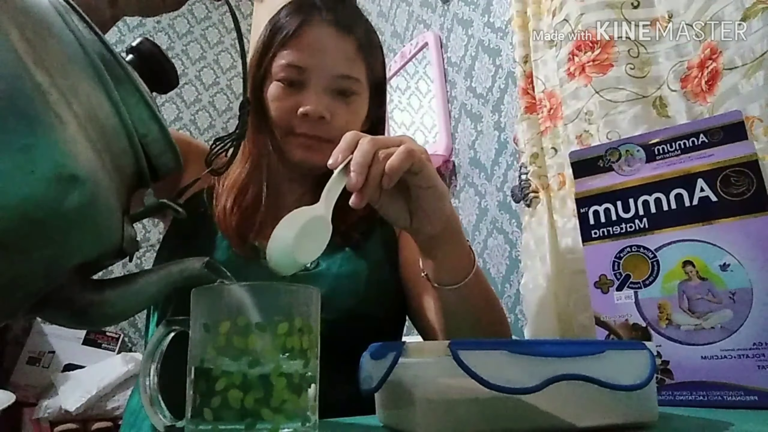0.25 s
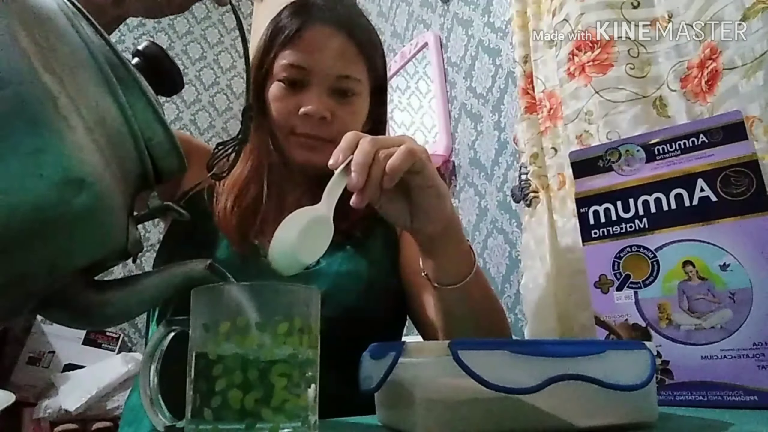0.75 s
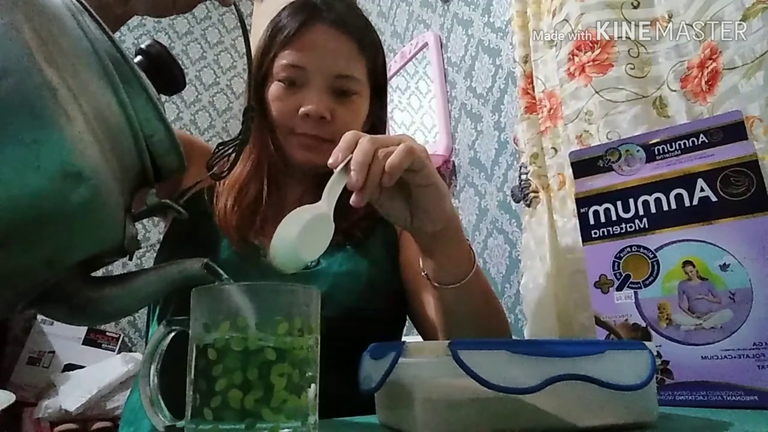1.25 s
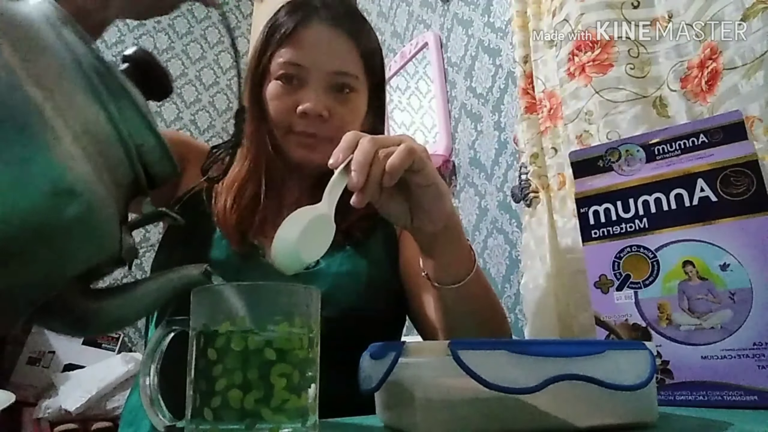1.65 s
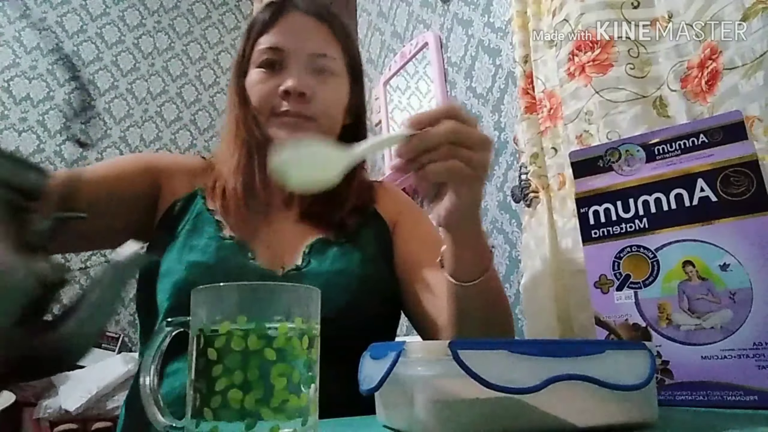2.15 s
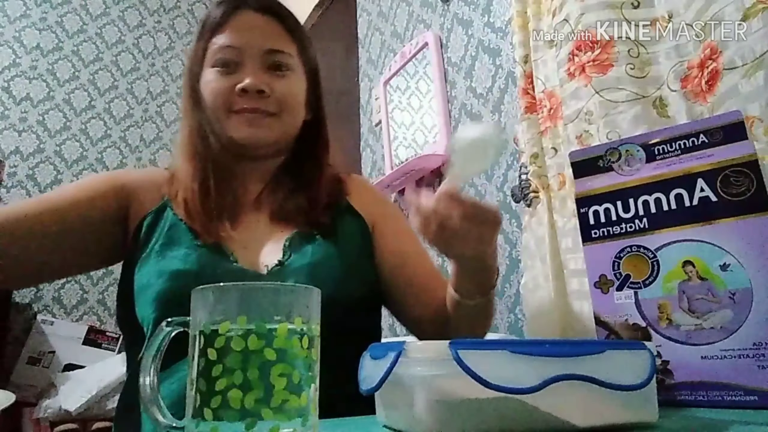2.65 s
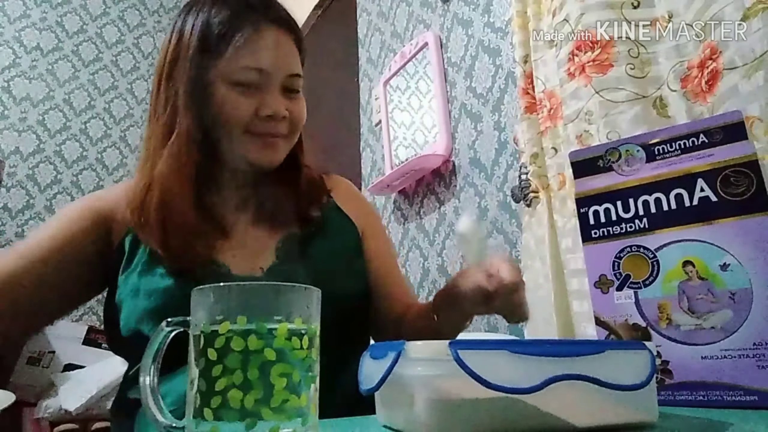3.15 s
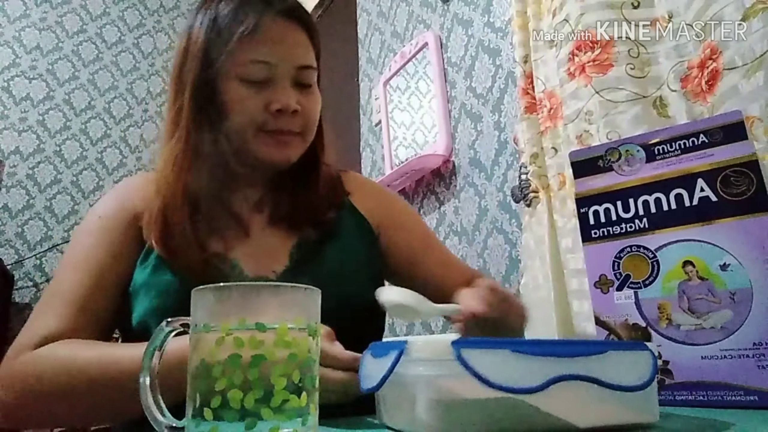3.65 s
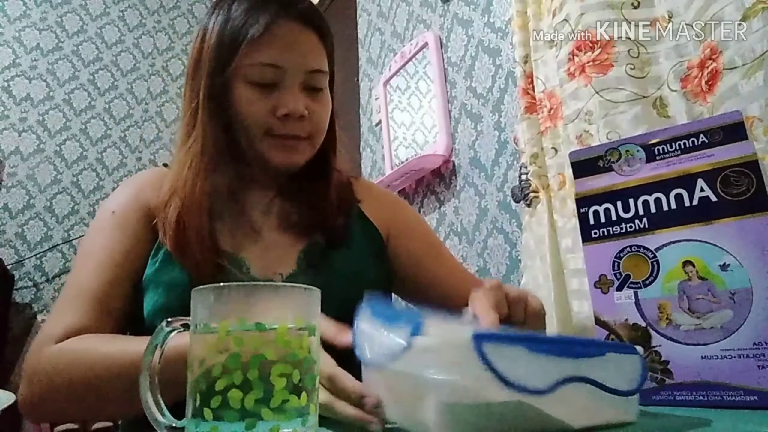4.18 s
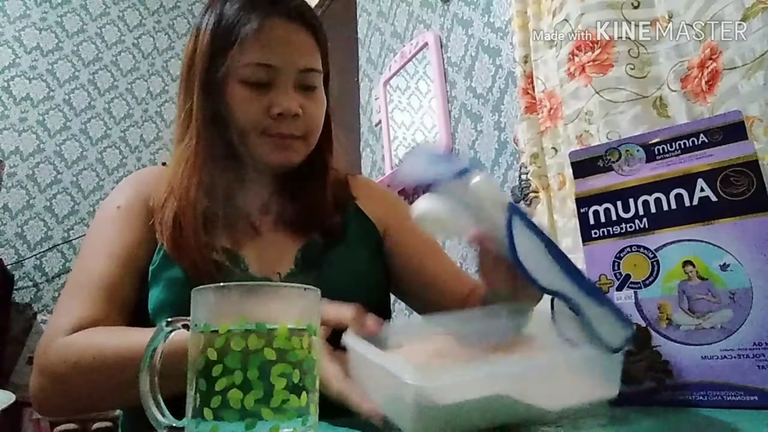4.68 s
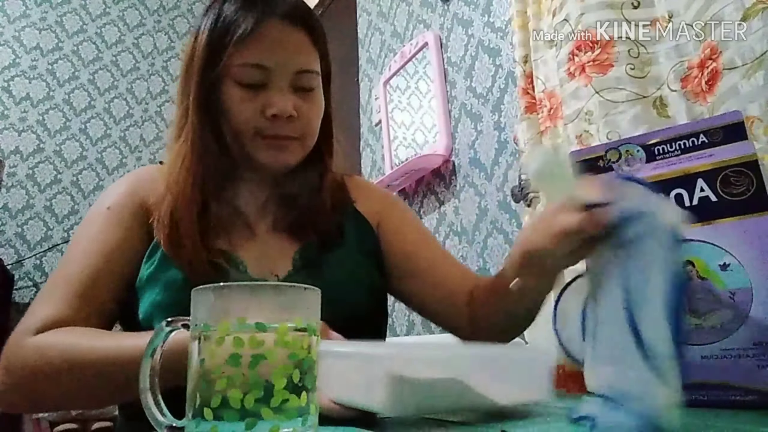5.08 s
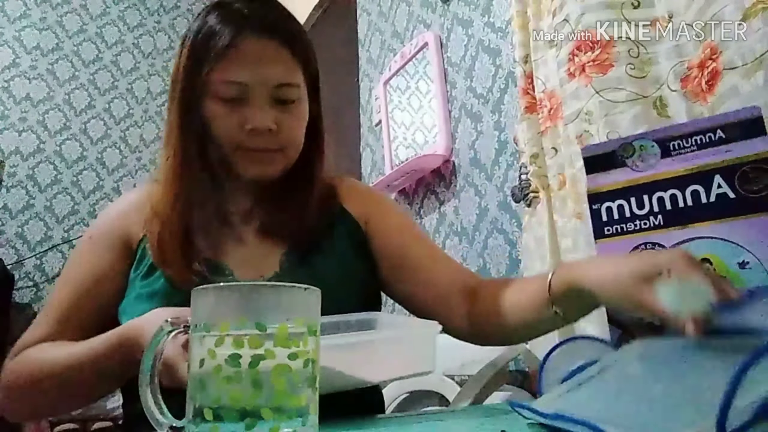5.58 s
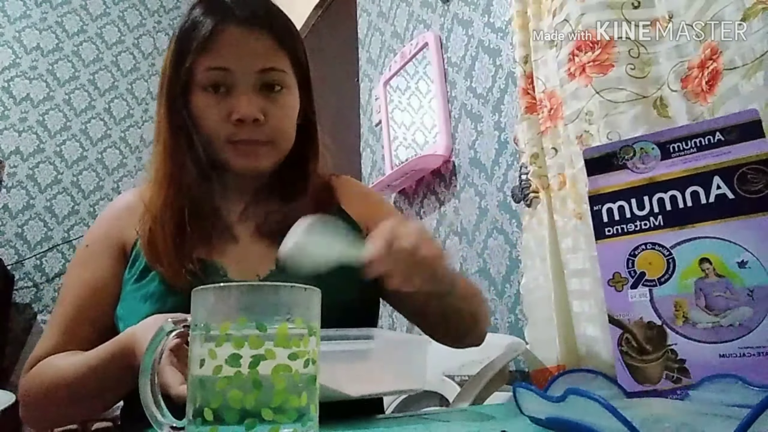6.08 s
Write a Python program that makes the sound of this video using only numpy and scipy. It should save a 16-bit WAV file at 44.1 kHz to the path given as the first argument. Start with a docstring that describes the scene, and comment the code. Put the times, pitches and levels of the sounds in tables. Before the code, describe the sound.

Water trickles faintly into a mug, a metal kettle clanks and clatters down, then a plastic box lid snaps loudly open and lands with a clack.

```python
"""At a table in a small room, water trickles from a metal kettle into a mug: resonant noise over a low hum.
The kettle clanks twice (ringing shell, low table thud) and is set aside on its stand. An arm thumps the table.
The lid of a plastic container creaks and snaps off (swinging wall, clicking flaps), then is laid down with
a clack and rocks to rest. Handling is friction noise over a rumble; room noise and a faint whine run on."""
import sys
import numpy as np
from scipy import signal
from scipy.fft import rfft, irfft, next_fast_len
from scipy.io import wavfile
from scipy.ndimage import map_coordinates

SR = 44100
rng = np.random.default_rng(int(sys.argv[2]) if len(sys.argv) > 2 else 0)


def master(y):
    """Save y as 16-bit WAV."""
    cut = np.clip(np.atleast_2d(y).T, -1, 1)
    pcm = np.round(cut * 32767)  # scale
    wavfile.write(sys.argv[1], SR, pcm.astype(np.int16))


N = 278906

# reverberation of the small room: f/Hz, t60/s
ROOM_T60 = [(60, 0.99), (150, 0.17), (500, 0.53), (1000, 0.25), (2000, 0.25), (6000, 0.25), (15000, 0.13)]
# colour of the reflections: f/Hz, relative level/dB
WALL_COLOUR = [(60, 3.5), (200, -4), (600, -1.5), (1000, -0.5), (2000, 2.5), (4000, -3.5), (6500, 1.5),
               (10000, -6), (15000, 4)]
# room noise: f/Hz, relative level/dB
AIR_SPECTRUM = [(25, -5), (50, -17), (78, -12), (100, -18), (135, -11.5), (200, -13), (300, -18),
                (450, -19.5), (600, -19), (850, -18.5), (1130, -24.5), (1600, -23.5), (2200, -30.5),
                (4200, -38.5), (15000, -41), (16000, -23.5)]
# rms of the room noise: t/s, level/dB
AIR_LEVEL = [(0, -60.5), (2.2, -58), (3.3, -60.5), (5.5, -60.5), (5.75, -67), (6.0, -65), (6.4, -62.5)]
# steady whine: f/Hz, level over room noise/dB
WHINE_TONES = [(841, -12.5), (1795, -23.5)]

# pour gain, common to stream and hum: t/s, level/dB
POUR_LEVEL = [(0, -69), (.3, -61), (.55, -68), (.8, -63), (1.05, -70), (1.35, -59), (1.9, -61), (2.2, -69),
              (2.3, -78)]
# resonances of the stream drumming in the mug: f/Hz, width/Hz, relative level/dB
STREAM_PEAKS = [(141, 30, -0.5), (174, 45, -2), (448, 21, -1.5), (914, 49, -11)]
STREAM_DB = -7.5  # over the pour gain
# low hum while pouring: f/Hz, level over pour gain/dB
HUM_TONES = [(134, -10), (162, -5), (187, -4.5)]
# faint narrow tones of the tilting kettle and the mug: start/s, end/s, f/Hz, width/Hz, peak level/dB
SINGS = [(.35, 0.45, 438, 30, -63.5), (0.91, 1.01, 472, 25, -69), (1.4, 1.48, 2280, 150, -66),
         (1.73, 1.91, 2140, 270, -64.5), (1.56, 1.94, 934, 160, -58.5), (1.4, 2.34, 860, 350, -64)]

# four bands of a blow, as filters: thump, knock, click, tick
BAND_FILTERS = [signal.butter(3, edges, 'band', fs=SR, output='sos') for edges in [(45, 400), (400, 1600),
                (1600, 5000), (5000, 16000)]]
# first instant of a hard contact: f/Hz, relative level/dB
SPIKE_SPECTRUM = [(300, -25), (1000, -5.5), (2000, 1), (3300, 1), (4500, -5.5), (6500, -0.5), (8000, -9.5),
                  (11000, -15), (15500, -8)]
# contact noise of box and kettle: f/Hz, relative level/dB
CRACK_SPECTRUM = [(100, 15), (700, 10), (1500, 1), (3000, -7), (4400, -10), (6700, -10), (8000, -14),
                  (11000, -23), (13500, -25), (15000, -20), (16000, -1.5)]
SPOT_OCTAVES = 0.21  # reach of a struck spot among the modes

# handle knocks on the kettle: t/s, knock level/dB, dullness (click under knock)/dB,
# favoured low f/Hz, favoured high f/Hz, tick over knock/dB
CLANKS = [(1.467, -36.5, 4.5, 440, 2880, -24), (1.632, -34, 6.4, 573, 1260, -20)]
# kettle shell, with a low table thud in the first row: f/Hz, relative level/dB, t60 before CLANK_RING/s
CLANK_MODES = [(70.6, 20, 0.09), (192, -18, 0.185), (426, 5, 0.15), (435.3, 5, 0.14), (545, -1, 0.12),
               (662, 2.5, 0.16), (710, -9, 0.24), (740, -16, 0.17), (875, 0, 0.19), (1038, 0.5, 0.14),
               (1050, -8, 0.097), (1124, -8, 0.29), (1160, -12, 0.07), (1233, -3.5, 0.12),
               (1348, 0.5, 0.086), (1406, -1, .05), (1530, -4, 0.065), (1820, -11, 0.089), (1890, -9, .06),
               (1996, -7, 0.13), (2120, -5.5, 0.14), (2246, -5, 0.079), (2335, -11, 0.21),
               (2560, -10, 0.093), (2740, -11, 0.032), (2940, 6, 0.03), (2965, -3.5, 0.031),
               (3150, -8, 0.1), (3430, -1.5, 0.054), (3580, -6, 0.082), (3630, -3, .035), (3815, -8, 0.058),
               (4300, -8, 0.09), (4460, -3, 0.022), (5700, -10, 0.022)]
CLANK_WEIGHT_DB, CLANK_RING = -12, 0.97  # bass over knock; multiple of t60
REBOUND_S, REBOUND_LOSS_DB, REBOUND_DULL_DB = 0.009, 7.5, 1  # handle touches the shell again
# base lands on its stand and chatters: t/s, knock level/dB, weight (bass over knock)/dB,
# dullness (click under knock)/dB, chatter length/s
SETDOWNS = [(2.6922, -41.5, -14, 5, .005), (2.7, -42.5, -10, 1, .015), (2.728, -49, -14, 28, .015),
            (2.753, -51.5, -16, 2.5, .005), (2.762, -30, -8.5, 7, .015), (2.777, -31, -2, 9, .015),
            (2.795, -38, 0.5, 10, .015), (2.818, -38.5, 3.5, 11.5, .005), (2.889, -50.5, -4, 12, .005)]
# base on its stand: f/Hz, relative level/dB, t60 before the blow's ring factor/s
STAND_MODES = [(69.8, 0, 0.56), (129, -4, 0.3), (187, 4, 0.11), (253, 8, 0.073), (313.5, 5, 0.16),
               (415, 0, 0.085), (460.6, 5.5, 0.14), (496, 7, 0.12), (599, 1.5, 0.087), (670, 3, 0.11),
               (843, 1.5, 0.2), (886, -1, 0.17), (938, 2.5, 0.1), (1032, 7, 0.057), (1303, -2, 0.16),
               (1382, -2.5, 0.12), (1620, -14, .12), (1870, -4, 0.07), (2220, -2.5, 0.15),
               (2340, -3, 0.076), (2770, -2, 0.066), (3980, -4, 0.061), (5430, -3.5, 0.07)]
# scraping metal: f/Hz, relative level/dB
RATTLE_SPECTRUM = [(100, 1), (600, 2.5), (1500, -9), (4000, -5), (5000, -4.5), (6700, -0.5), (8000, -15.5),
                   (10500, -18), (12300, -12), (15000, -12), (16000, -7)]
CHATTER_GAP_S, CHATTER_GROWTH = 0.0075, 1.3  # first gap; each gap over the last
CHATTER_LOSS_DB, CHATTER_WEIGHT_DB, CHATTER_DULL_DB = 2.5, 1.5, 2.5  # change per touch
PLASTIC_FALL, BASE_FALL = 1.52, 1  # loss of the tick band, as a multiple of the dullness

# arm, container, lid and spoon meet the table: t/s, knock level/dB, weight (bass over knock)/dB,
# dullness (click under knock)/dB, ring (multiple of t60), favoured boom f/Hz, favoured knock f/Hz
KNOCKS = [(2.3001, -34.5, 10, 19.6, 0.42, 225, 980), (2.4434, -42.5, 12.5, 28, 0.49, 265, 865),
          (2.511, -42, 8.5, 15.5, 0.9, 116, 920), (3.025, -55.5, 13, 25, 0.56, 190, 510),
          (3.373, -54, 9, 6.1, 1.26, 115, 607), (3.658, -41, -2, 20, 0.8, 258, 563),
          (3.701, -51.5, -3, 12, 0.63, 230, 704), (3.771, -47.5, 3, 22, 0.46, 120, 900),
          (3.811, -56, 9.5, 16, 0.55, 150, 800), (3.826, -52.5, 3, 12.6, 0.76, 150, 700),
          (4.556, -21.5, -2, 9.7, 0.97, 173, 650), (4.5598, -25, 1, 16, 0.8, 285, 490),
          (4.586, -27.5, -13, 26, 0.73, 277, 1130), (4.754, -41, 1, 25, 0.92, 147, 796),
          (4.8752, -33.5, -1.5, 23, 0.64, 124, 674), (5.3101, -28, 5.5, 22.5, 0.81, 216, 750),
          (5.3357, -41.5, 14, 25, 0.44, 218, 454), (5.5462, -21, 3.5, 10.2, .85, 179, 830),
          (5.5496, -27, 2.5, 10.4, 1.07, 278, 1500), (5.575, -34, 3, 19, 1.3, 149.5, 1500),
          (5.601, -43, -7, 15, 1.9, 180, 1540)]
# table top and the plastic box on it: f/Hz, relative level/dB, t60 before the blow's ring factor/s
BOX_MODES = [(70, -22, 0.4), (113.2, -3, 0.24), (147.7, -8, .09), (184.8, 3, 0.11), (216.4, 1.5, 0.077),
             (250, 2.5, 0.065), (275.6, 2, 0.1), (353, -7, 0.053), (421, 1, 0.072), (486, 0, 0.1),
             (564, -.5, 0.13), (660, 3, 0.046), (753, 4, 0.025), (792, 6, 0.021), (928, 0.5, 0.056),
             (1009, 2, 0.037), (1217, -8, 0.06), (1343, -17, 0.097), (1531, -10.5, 0.12),
             (1794, -12.5, 0.036), (2040, -1, 0.03), (2150, -4, .035), (2440, -4, 0.012), (2770, -7, 0.026),
             (3500, -19, 0.015), (6600, -2, 0.0082)]
# the rest of the weight lands just after the edge
SETTLE_S, SETTLE_LOSS_DB, SETTLE_WEIGHT_DB, SETTLE_DULL_DB = 0.011, 8.5, 6, 13
# lid rocks to rest: first touch, first gap, each gap over the last, first level, loss per touch
ROCK_START_S, ROCK_GAP_S, ROCK_SHRINK, ROCK_DB, ROCK_LOSS_DB = 5.612, 0.069, 0.62, -35.5, 5.5
ROCK_WEIGHT_DB, ROCK_DULL_DB, ROCK_BOOM_HZ, ROCK_KNOCK_HZ = 4, 26, 176, 570

# arm, kettle, box or lid slides while the table rumbles: t/s, length/s, rub level/dB,
# treble gain over rub/dB, rumble level/dB
STROKES = [(2.314, 0.081, -52, 8, -64), (2.418, .012, -51, -6, -60), (2.494, 0.032, -57.5, 9, -43.5),
           (2.707, 0.059, -45.5, 10.5, -80), (3.056, 0.046, -80, 0, -55.5), (3.392, 0.019, -64, 3, -50.5),
           (3.668, 0.028, -62, -2, -45), (3.734, 0.12, -61.5, 4.5, -50), (3.967, 0.028, -60.5, -1, -52.5),
           (4.021, 0.058, -54.5, -6, -50.5), (4.441, .08, -57.5, -2, -59), (4.565, 0.033, -42.5, 2.5, -47),
           (4.76, 0.023, -68, -11, -55), (4.903, 0.17, -62.5, 3, -59.5), (5.2, .015, -60, -8, -45),
           (5.438, 0.11, -63, 7, -74), (5.562, 0.085, -49, -5.5, -48.5), (5.68, 0.08, -65.5, -8, -49.5)]
# sliding or chattering edge: start/s, end/s, f/Hz, width/Hz, peak level/dB
RASPS = [(2.33, 2.43, 2350, 700, -61), (2.335, 2.44, 4500, 1200, -66.5), (2.36, 2.45, 6500, 700, -66),
         (3.655, 3.76, 6600, 900, -68.5), (4.44, 4.48, 5000, 1200, -74), (4.478, 4.508, 4300, 700, -57.5),
         (4.56, 4.65, 2180, 1600, -57.5), (5.42, 5.5, 6900, 1200, -73.5), (5.55, 5.66, 1590, 900, -50)]
# skin and plastic friction: f/Hz, relative level/dB
FRICTION_SPECTRUM = [(150, -21), (300, 2.5), (600, 8), (1000, 2), (1500, -7), (2200, -13.5), (3300, -20),
                     (4600, -27), (6600, -21), (8500, -34.5), (11000, -36), (15000, -27), (16000, -30)]
# table rumble: f/Hz, relative level/dB
RUMBLE_SPECTRUM = [(24, -36), (40, -3), (91, 1), (215, -6.5), (261, -2.5), (339, -26.5), (386, -10),
                   (900, -40.5), (1170, -74), (1980, -120)]
# time to rise or fall by the depth
STROKE_ATTACK_S, STROKE_RELEASE_S, STROKE_DEPTH_DB = 0.035, 0.15, 25
GRAIN_DB = 1  # fine stick and slip
GRIP_DB = 1.3  # the grip catches and lets go
BRIGHT_HZ = 1800  # crossover to the treble

# lid's flaps and rim click: t/s, knock level/dB, dullness (click under knock)/dB,
# tick over knock/dB, reflections over direct/dB
CLICKS = [(3.6466, -43, 6.5, -18, -6), (3.658, -42.5, 4.5, -15.5, -4.5), (4.571, -50.5, 8, 2, -10),
          (5.2197, -56, 8.5, -15.5, -13), (5.454, -57.5, 4, -4.5, -18.5), (5.4669, -40, -1.5, -4.5, -11),
          (6.2772, -44, 6.5, -25, -7.5)]
# stiff flaps of the lid: f/Hz, relative level/dB, t60/s
FLAP_MODES = [(740, 1, 0.017), (1020, 3, 0.018), (1230, -6.5, 0.01), (1910, 0.5, 0.016), (2700, -4, .004),
              (6200, -2, .005)]
# contact noise of the flaps: f/Hz, relative level/dB
FLAP_CRACK_SPECTRUM = [(100, -28), (400, -1), (900, 9.5), (3200, 13.5), (4500, -9.5), (6700, -2),
                       (8500, -24.5), (12000, -27.5), (15500, -16)]
FLAP_WEIGHT_DB = -28  # bass over knock

# hand or forearm presses softly on the box: t/s, peak level/dB, f/Hz, decay time constant each side/s
BUMPS = [(3.783, -30, 94, 0.0052), (5.218, -23, 146, 0.0047), (5.4925, -29, 200, 0.005)]

# lid's rim slips and its wall springs back: t/s, wall level before its build-up/dB, wall f/Hz, t60/s,
# tick over wall/dB
POPS = [(4.4757, -14.5, 796, 0.016, -22), (4.481, -19, 864, 0.014, -28), (4.487, -22.5, 1086, 0.026, -17),
        (4.492, -18.5, 953, 0.024, -18.5), (4.5106, -32, 960, .012, -24), (4.516, -21.5, 980, 0.013, -20),
        (4.5364, -21, 1120, 0.015, -14), (4.604, -21, 1110, 0.018, -19), (4.853, -39, 885, 0.023, -17),
        (4.9665, -33, 613, 0.11, -11.5), (4.968, -31.5, 1340, 0.01, -7.5), (5.051, -45.5, 1037, 0.027, -15),
        (5.072, -38.5, 830, 0.034, -16), (5.6759, -23.5, 673, 0.017, -22.5)]
# slipping rim: f/Hz, relative level/dB
RIM_TICK_SPECTRUM = [(100, 15), (700, 14), (1500, 4), (3000, -8), (4300, -7), (5500, -16), (6800, -6),
                     (8000, -21), (11000, -30), (15500, -14)]
OVERTONE_RATIO, OVERTONE_DB = 1.45, -23.5  # wall's second mode against its first

TOP_HZ = 15700  # recorder's band limit


def amp(db):
    """Decibels to gain."""
    return 10 ** (np.asarray(db) / 20)


def unit(x):
    """Scale to rms 1."""
    return x / np.sqrt(np.mean(x ** 2) + 1e-20)


def along(points, hz):
    """Interpolate (f/Hz, value) points on a log axis."""
    f, v = np.transpose(points)
    return np.interp(np.log(hz + 1), np.log(f + 1), v)


def level(rows):
    """Gain per sample from (t/s, level/dB) rows, silent outside them."""
    s, db = np.transpose(rows)
    return amp(np.interp(np.arange(N) / SR, s, db, left=-np.inf, right=-np.inf))


def wobble(rate_hz):
    """Smooth random curve, rate_hz knots a second."""
    knots = rng.standard_normal(int(N * rate_hz / SR) + 4)
    return map_coordinates(knots, [np.arange(N) * rate_hz / SR])


def filtered(x, response):
    """Multiply the spectrum of x by a response of frequency."""
    size = next_fast_len(len(x) + 8192)
    spectrum = rfft(x, size) * response(np.fft.rfftfreq(size, 1 / SR))
    return irfft(spectrum, size)[:len(x)]


def noise(spectrum, size):
    """Coloured noise of rms 1."""
    return unit(filtered(rng.standard_normal(size), lambda hz: amp(along(spectrum, hz))))


def resonant(peaks):
    """Noise of rms 1 in (f/Hz, width/Hz, level/dB) resonances."""
    def response(f):
        return sum(amp(db) / (1 + (2 * (f - hz) / width) ** 2) for hz, width, db in peaks)
    return unit(filtered(rng.standard_normal(N), response))


def swells(rows):
    """Narrow bands of noise, each under a half-sine envelope."""
    out = np.zeros(N)
    for start, end, hz, width, db in rows:
        progress = np.clip((np.arange(N) / SR - start) / (end - start), 0, 1)
        out += amp(db) * np.sin(np.pi * progress) * resonant([(hz, width, 0)])
    return out


def tone(hz, drift_hz, waver_db):
    """Unbroken sine of rms 1 that drifts a little in pitch and level."""
    phase = 2 * np.pi * np.cumsum(hz + drift_hz * wobble(4.6)) / SR
    return unit(np.sin(phase) * amp(waver_db * wobble(12)))


def add(track, s, x):
    """Mix x into the track at time s."""
    part = track[round(s * SR):][:len(x)]
    part += x[:len(part)]


def in_room(x, room_db, build_s=0.0069):
    """Direct sound plus a fresh random tail that builds up, then decays at each frequency's own t60."""
    hz, t, z = signal.stft(rng.standard_normal(int(SR * 0.5)), SR, nperseg=256)
    t60 = along(ROOM_T60, hz)[:, None]
    decay = amp(along(WALL_COLOUR, hz)[:, None] - 60 * t / t60) / np.sqrt(t60)
    tail = signal.istft(z * decay, SR, nperseg=256)[1]
    tail *= 1 - np.exp(-(np.arange(len(tail)) / SR / build_s) ** 2)
    tail *= amp(room_db) / np.linalg.norm(tail)
    tail[0] += 1  # direct sound
    return signal.fftconvolve(x, tail)


def spike(size):
    """First instant of a hard contact: one bright pulse of unit energy."""
    pulse = filtered(signal.unit_impulse(size, SR // 2000), lambda hz: amp(along(SPIKE_SPECTRUM, hz)))
    return pulse / np.linalg.norm(pulse)


def strike(modes, ring, band_db, crack, crack_db, crack_t60, swell, spike_db):
    """One blow: spike, ringing modes and contact noise; band_db sets each band's energy as rms over 10 ms."""
    t = np.arange(SR // 4) / SR
    hz, db, t60 = np.transpose(modes)[:, :, None]
    # each contact point drives the modes differently
    sign, size, detune = rng.standard_normal((3, len(modes), 1))
    waves = np.sign(sign) * np.sin(np.float32(2 * np.pi * hz * (1 + 0.0023 * detune) * t))
    rise = 1 - np.exp(np.float32(-t * hz / swell))  # time constant of swell cycles: bass comes last
    fade = np.exp(np.float32(-np.log(1000) * t / (t60 * ring)))
    body = np.sum(waves * rise * fade * amp(db + 1.84 * size), axis=0)
    contact_noise = noise(crack, len(t)) * amp(crack_db - 60 * t / crack_t60)
    blow = amp(spike_db) * spike(len(t)) + body + contact_noise
    bands = [signal.sosfilt(sos, blow) for sos in BAND_FILTERS]
    levelled = [amp(db) * band / np.linalg.norm(band) for db, band in zip(band_db, bands)]
    return sum(levelled) * np.sqrt(SR / 100)


def contact(db, weight_db, dull_db, fall, top_db=0):
    """Band levels of a blow: weight adds bass; a soft contact loses click by dull_db, tick by fall times it."""
    return db + np.array([weight_db, 0, -dull_db, top_db - fall * dull_db])


def driven(modes, low_hz, high_hz, spot_db):
    """The struck spot drives the modes near two pitches harder than the rest."""
    hz, db, t60 = np.transpose(modes)
    near = sum(np.exp(-(np.log2(hz / spot) / SPOT_OCTAVES) ** 2) for spot in (low_hz, high_hz))
    return np.transpose([hz, db + spot_db * near, t60])


def bounce_times(gap_s, ratio, count):
    """Times of repeated touches from the first; each gap is ratio times the last."""
    return np.append(0, np.cumsum(gap_s * ratio ** np.arange(count - 1)))


def background():
    """Room noise with a faint steady whine, both on one level curve."""
    whine = sum(amp(db) * tone(hz, drift_hz=2, waver_db=2.0) for hz, db in WHINE_TONES)
    return level(AIR_LEVEL) * (noise(AIR_SPECTRUM, N) + whine)


def pouring():
    """A thin stream drums softly in the mug over a low hum; narrow noise bands swell and fade as tones."""
    flutter = amp(1.2 * wobble(18))
    stream = amp(STREAM_DB) * unit(resonant(STREAM_PEAKS) * flutter)
    hum = sum(amp(db) * tone(hz, drift_hz=1.28, waver_db=1.7) for hz, db in HUM_TONES)
    return level(POUR_LEVEL) * (stream + hum) + swells(SINGS)


def kettle():
    """The handle knocks and rebounds: the shell rings, the table thuds; then the base chatters on its stand."""
    out = np.zeros(N)
    for s, db, dull, low_hz, high_hz, tick_db in CLANKS:
        modes = driven(CLANK_MODES, low_hz, high_hz, spot_db=5)
        for delay, loss, soft in [(0, 0, 0), (REBOUND_S, REBOUND_LOSS_DB, REBOUND_DULL_DB)]:
            band_db = db - loss + np.array([CLANK_WEIGHT_DB, 0, -dull - soft, tick_db - soft])
            blow = strike(modes, CLANK_RING, band_db, CRACK_SPECTRUM,
                          crack_db=3.5, crack_t60=0.05, swell=0.97, spike_db=4)
            add(out, s + delay, in_room(blow, room_db=-5))
    for s, db, weight, dull, length in SETDOWNS:
        delays = bounce_times(CHATTER_GAP_S, CHATTER_GROWTH, count=5)
        for k, delay in enumerate(delays[delays < length]):
            # each touch is weaker, duller and heavier for its level
            band_db = contact(db - k * CHATTER_LOSS_DB, weight + k * CHATTER_WEIGHT_DB,
                              dull + k * CHATTER_DULL_DB, BASE_FALL)
            blow = strike(STAND_MODES, 0.8, band_db, RATTLE_SPECTRUM,
                          crack_db=10, crack_t60=0.05, swell=0.7, spike_db=20)
            add(out, s + delay, in_room(blow, room_db=-12.0))
    return out


def box_contacts():
    """Rows as in KNOCKS: each knock, its settling (weaker still if weight is negative), and the rocking lid."""
    for s, db, weight, dull, ring, *spot in KNOCKS:
        yield s, db, weight, dull, ring, *spot
        settle_db = db - SETTLE_LOSS_DB + min(weight, 0)
        yield s + SETTLE_S, settle_db, weight + SETTLE_WEIGHT_DB, dull + SETTLE_DULL_DB, ring, *spot
    for k, delay in enumerate(bounce_times(ROCK_GAP_S, ROCK_SHRINK, count=4)):
        rock_db = ROCK_DB - k * ROCK_LOSS_DB
        yield ROCK_START_S + delay, rock_db, ROCK_WEIGHT_DB, ROCK_DULL_DB, 1, ROCK_BOOM_HZ, ROCK_KNOCK_HZ


def container():
    """Contacts crack briefly and set table and box booming; the struck spot favours some modes."""
    out = np.zeros(N)
    for s, db, weight, dull, ring, boom_hz, knock_hz in box_contacts():
        band_db = contact(db, weight, dull, PLASTIC_FALL, top_db=-4)
        modes = driven(BOX_MODES, boom_hz, knock_hz, spot_db=8.5)
        blow = strike(modes, ring, band_db, CRACK_SPECTRUM,
                      crack_db=10.5, crack_t60=0.02, swell=0.41, spike_db=12.5)
        add(out, s, in_room(blow, room_db=-9.5))
    return out


def handling():
    """Uneven friction of skin and plastic over a table rumble; each stroke rises, holds and fades."""
    t = np.arange(N) / SR
    force, bright, press = np.zeros((3, N))
    for s, length, rub_db, bright_db, rumble_db in STROKES:
        before = np.maximum(s - t, 0) / STROKE_ATTACK_S
        after = np.maximum(t - s - length, 0) / STROKE_RELEASE_S
        stroke = amp(-STROKE_DEPTH_DB * np.minimum(before + after, 10))
        force += amp(rub_db) * stroke
        bright += amp(rub_db + bright_db) * stroke
        press += amp(rumble_db) * stroke
    roughness = amp(GRIP_DB * wobble(70) + 2.8 * wobble(150) + GRAIN_DB * wobble(900))
    friction = unit(noise(FRICTION_SPECTRUM, N) * roughness)
    treble = filtered(friction, lambda hz: 1 - 1 / (1 + (hz / BRIGHT_HZ) ** 4))
    rasp = swells(RASPS) * amp(GRAIN_DB * wobble(440))
    rub = force * (friction - treble) + bright * treble + rasp
    boom = press * unit(noise(RUMBLE_SPECTRUM, N) * amp(2.9 * wobble(40)))
    return in_room(rub + boom, room_db=-10)[:N]


def flaps():
    """The lid's stiff flaps click briefly, some dry and some with more room; short modes, none of the table's."""
    out = np.zeros(N)
    for s, db, dull, tick_db, room_db in CLICKS:
        band_db = db + np.array([FLAP_WEIGHT_DB, 0, -dull, tick_db])
        blow = strike(FLAP_MODES, 1, band_db, FLAP_CRACK_SPECTRUM,
                      crack_db=8.5, crack_t60=0.018, swell=0.3, spike_db=23.5)
        add(out, s, in_room(blow, room_db=room_db))
    return out


def bumps():
    """A soft push: a low cosine that swells and fades exponentially about its centre."""
    out, t = np.zeros(N), np.arange(SR // 8) / SR
    t = t - t.mean()
    for s, db, hz, width in BUMPS:
        push = amp(db) * np.cos(2 * np.pi * hz * t) * np.exp(-np.abs(t) / width)
        add(out, s + t[0], in_room(push, room_db=-7))
    return out


def lid():
    """Each slip of the rim ticks and lets the thin wall swing briefly, with a weaker second mode."""
    out, t = np.zeros(N), np.arange(SR // 4) / SR
    for s, db, wall_hz, t60, tick_db in POPS:
        first = np.sin(2 * np.pi * wall_hz * t)
        second = amp(OVERTONE_DB) * np.sin(2 * np.pi * OVERTONE_RATIO * wall_hz * t)
        wall = (first + second) * amp(-60 * t / t60) * (1 - np.exp(-t / 0.00073))
        tick = noise(RIM_TICK_SPECTRUM, len(t)) * amp(tick_db - 60 * t / 0.024)
        add(out, s, in_room(amp(db) * (wall + tick), room_db=-8.5))
    return out


def scene():
    """All sources at one microphone."""
    water_and_kettle = background() + pouring() + kettle()
    table_and_box = container() + handling() + flaps() + bumps() + lid()
    return (water_and_kettle + table_and_box)[None]


def record(dry):
    """The recorder keeps nothing above its band limit."""
    return np.array([filtered(x, lambda hz: hz < TOP_HZ) for x in dry])


dry = scene()
out = record(dry)
master(out)
```